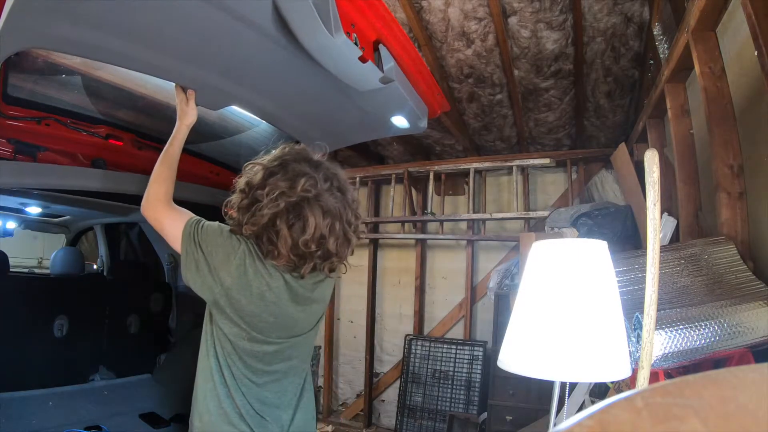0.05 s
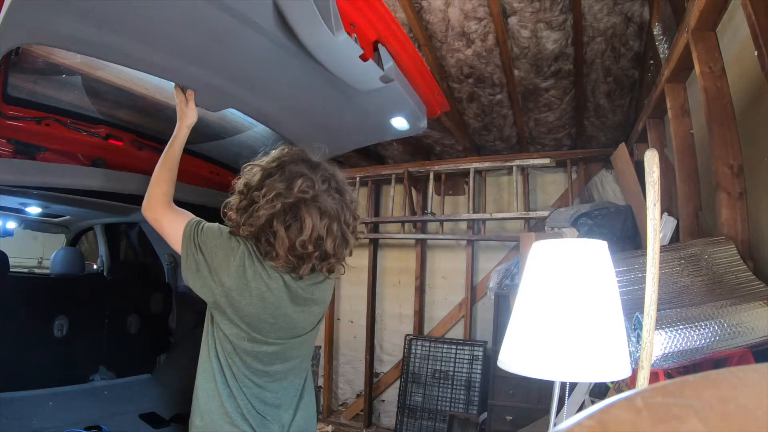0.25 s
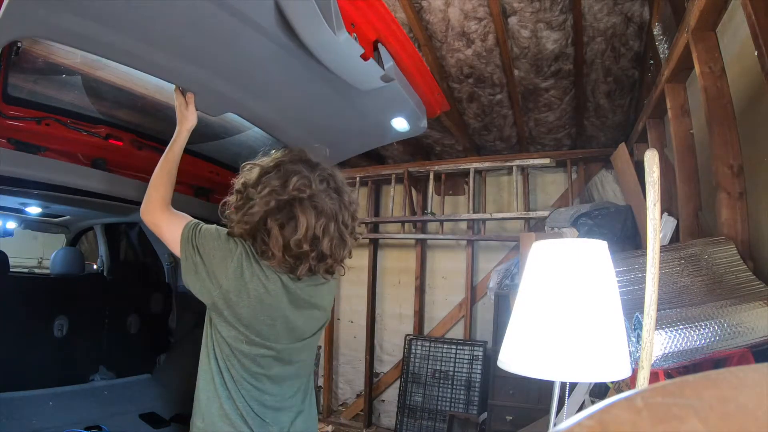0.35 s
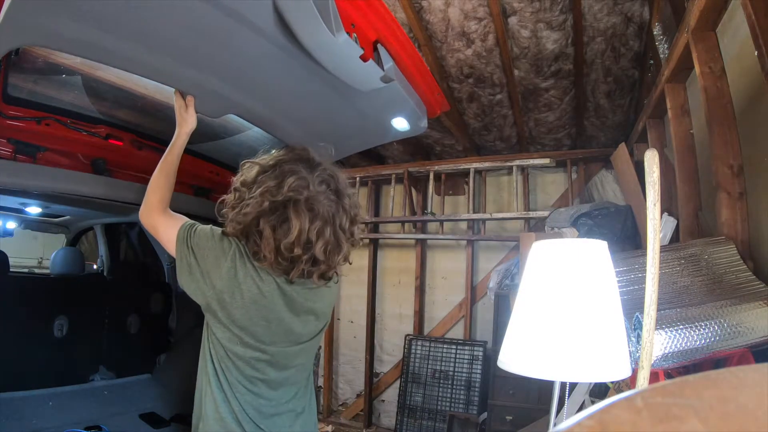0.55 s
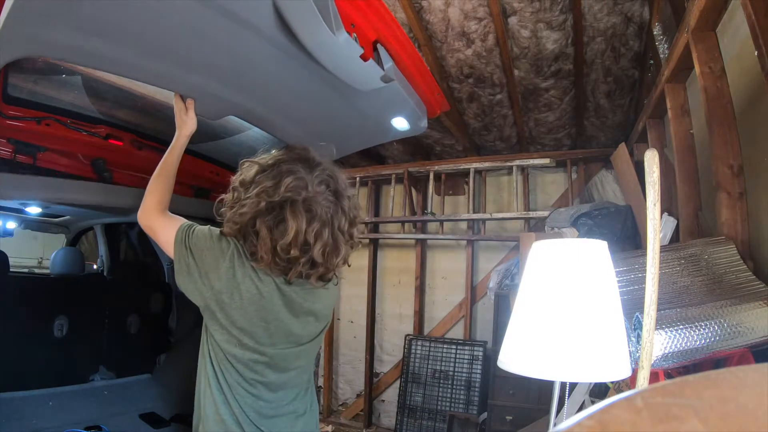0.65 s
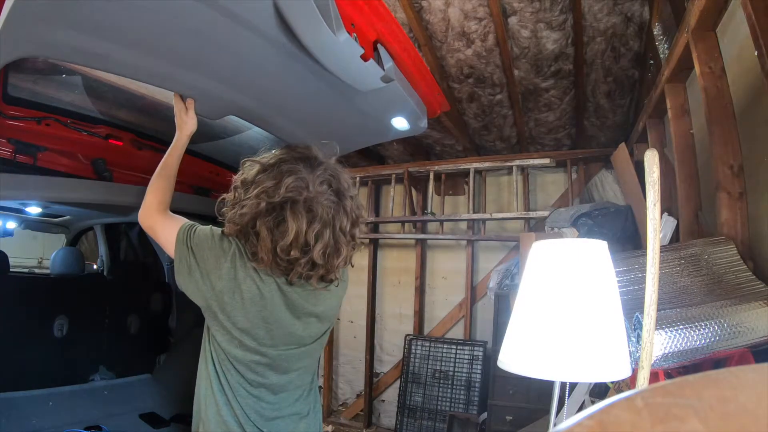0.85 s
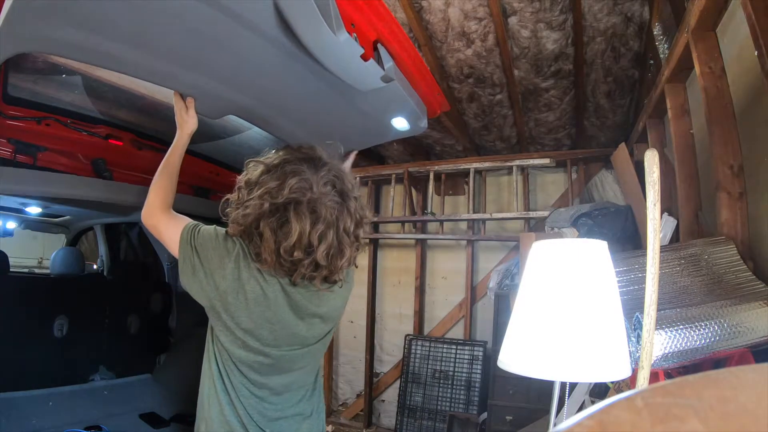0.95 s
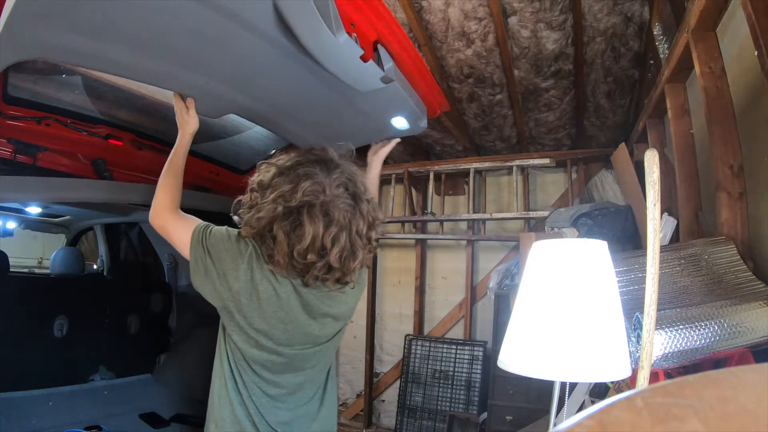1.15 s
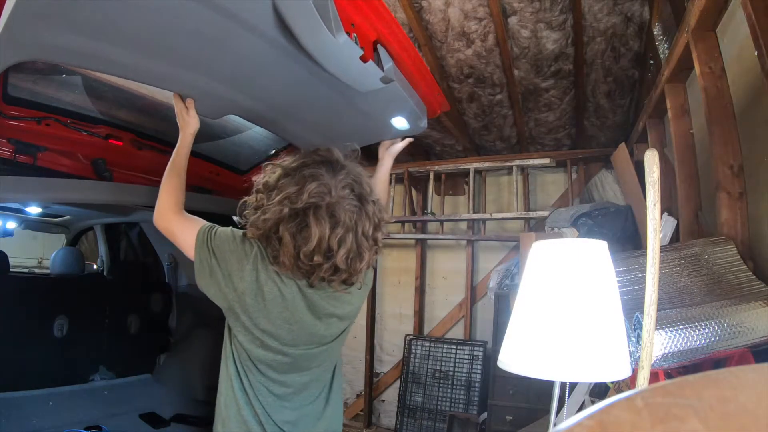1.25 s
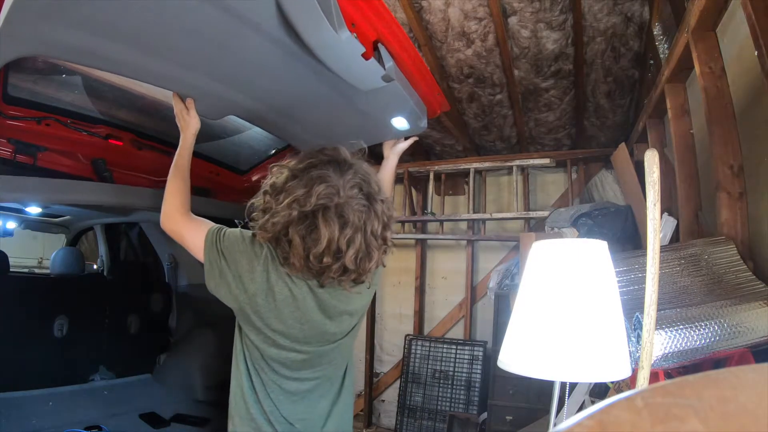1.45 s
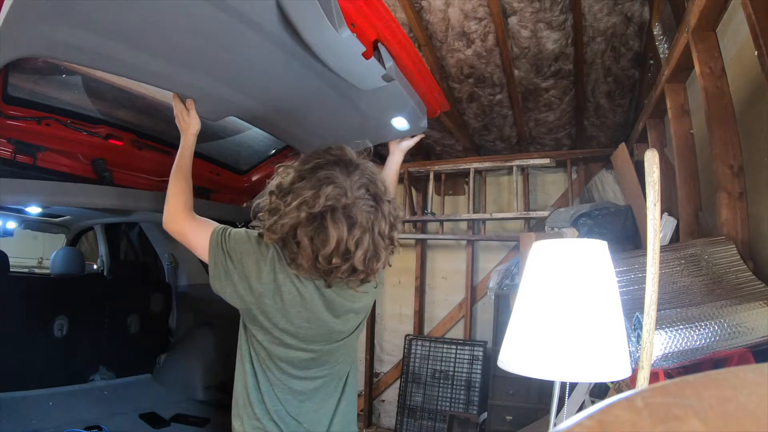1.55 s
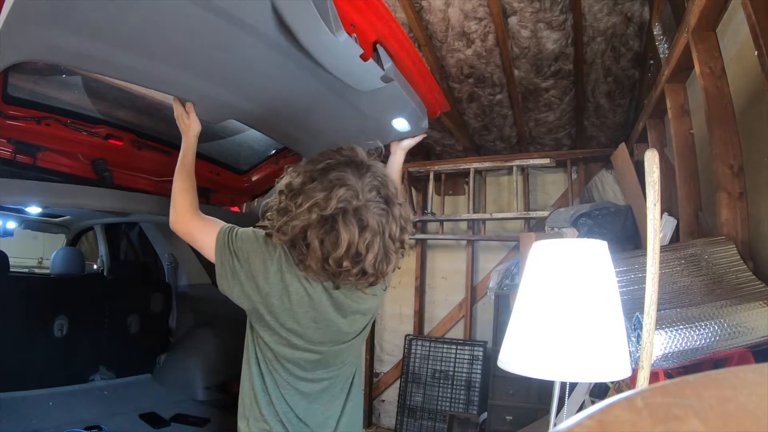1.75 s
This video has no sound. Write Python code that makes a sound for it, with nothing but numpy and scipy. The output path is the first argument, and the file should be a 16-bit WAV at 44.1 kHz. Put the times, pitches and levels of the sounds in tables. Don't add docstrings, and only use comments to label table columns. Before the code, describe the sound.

Sharp plastic crack as a car panel fastener pops free, then faint creaks in a quiet garage

```python
import sys
import numpy as np
from scipy import signal
from scipy.fft import rfft, irfft
from scipy.io import wavfile
from scipy.ndimage import uniform_filter1d

SR = 44100
rng = np.random.default_rng(int(sys.argv[2]) if len(sys.argv) > 2 else 0)


def pcm_store(signal):
    levels = np.round(np.clip(np.atleast_2d(signal), -1, 1) * 32767)
    wavfile.write(sys.argv[1], SR, levels.astype(np.int16).T)


def field_ratio(decibels):
    return 10 ** (np.asarray(decibels, dtype=float) / 20)


N = 79380

# [f/Hz, likeness 0-1]
AIR_SAME = [(60, 1), (180, 1), (530, 0.76), (1580, 0.44), (4700, 0.38), (14000, 0.02)]
# [f/Hz, lead/rad]
AIR_LEAD = [(100, 0), (780, 0), (3100, 0), (5000, 0.74)]
# [f/Hz, level/dB]
AIR_PAN = [(60, -1.2), (230, -1.07), (920, 1), (3580, 1.0), (14000, -1)]


def evened(x):
    return x / np.sqrt(np.mean(x ** 2) + 1e-20)


def read(points, hz):
    f, value = np.transpose(points)
    return np.interp(np.log(hz + 1), np.log(f + 1), value)


def add(mix, s, sound):
    part = mix[:, round(s * SR):][:, :sound.shape[1]]
    part += sound[:, :part.shape[1]]


def noise(spectrum, same, lead, pan, patchy_db, size, count):
    frames = count * 4 // size + 6
    hz = np.fft.rfftfreq(size, 1 / SR)
    a, b, c, d, patches = rng.standard_normal((frames, len(hz), 5)).T
    patches = uniform_filter1d(patches, size=10, axis=0)
    patches = evened(uniform_filter1d(patches, size=10, axis=1))
    likeness = np.clip(read(same, hz), 0, 1)[:, None]
    left = a + 1j * b
    shared = likeness * left * np.exp(-1j * read(lead, hz))[:, None]
    separate = np.sqrt(1 - likeness ** 2) * (c + 1j * d)
    right = (shared + separate) / field_ratio(read(pan, hz))[:, None]
    edge_db = -200 * ((hz < spectrum[0][0] * .5) | (hz > spectrum[-1][0] * 2))
    level_db = (read(spectrum, hz) + edge_db)[:, None] + patchy_db * patches
    z = np.array([left, right]) * field_ratio(level_db)
    sound = signal.istft(z, nperseg=size, noverlap=size * 3 // 4)[1]
    return evened(sound[:, size:size + count])


def air():
    # [f/Hz, level/dB per Hz]
    air_colour = [(88, -9), (150, -11), (261, -8), (298, -5.5), (328, -9), (383, -11), (957, -11),
                  (3380, -28), (14400, -59.5)]
    hiss = noise(air_colour, AIR_SAME, AIR_LEAD, AIR_PAN, patchy_db=1.2, size=1024, count=N)
    top_edge = signal.butter(8, 11600, fs=SR, output="sos")
    return field_ratio(-47.5) * signal.sosfilt(top_edge, hiss)


def rumble():
    # [f/Hz, level/dB per Hz]
    drone_colour = [(12, -34), (20, -17), (27, -14), (49, -2.5), (65, 2.5), (126, -5), (200, -27),
                    (260, -63), (440, -120)]
    # [t/s, level/dB]
    early_swell = [(0, -29.5), (.03, -32.5), (.1, -38), (.25, -34)]
    # [t/s, level/dB]
    late_swell = [(.45, -33.5), (.6, -32.5), (.8, -40.5), (1.0, -37.5), (1.2, -38), (1.4, -37), (1.65, -33),
                  (1.8, -39.5)]
    s, db = np.transpose(list(early_swell) + list(late_swell))
    low = noise(drone_colour, AIR_SAME, AIR_LEAD, AIR_PAN, patchy_db=-3.5, size=4096, count=N)
    return field_ratio(np.interp(np.arange(N) / SR, s, db)) * low


def garage():
    # [f/Hz, t60/s]
    tail_t60 = [(100, 1), (300, 0.65), (700, 0.34), (1500, 0.26), (4000, 0.23), (10000, 0.28)]
    # [f/Hz, likeness 0-1]
    tail_same = [(100, .99), (400, 1), (1000, 0.74), (3000, 0.65), (10000, .4)]
    white = [(50, 0), (16000, 0)]
    x = noise(white, tail_same, AIR_LEAD, AIR_PAN, patchy_db=1.5, size=512, count=SR * 3 // 4)
    hz, t, z = signal.stft(x, SR, nperseg=512)
    decay_db = -60 * t / np.maximum(read(tail_t60, hz), .05)[:, None]
    tail = signal.istft(z * field_ratio(decay_db), SR, nperseg=512)[1]
    return tail / np.linalg.norm(tail[0])


def ports(x):
    # [f/Hz, lead/rad]
    panel_lead = [(100, -.08), (250, -.2), (600, -.6), (1200, -1.3), (2700, .3), (5200, 1.1), (8000, .8),
                  (13000, 1.0)]
    # [f/Hz, level/dB]
    panel_pan = [(60, -0.61), (150, -0.74), (370, -0.51), (920, -1.7), (2270, 1), (5640, 1.0),
                 (14000, -1.0)]
    hz = np.fft.rfftfreq(N, 1 / SR)
    turn = np.exp(.5j * read(panel_lead, hz)) * field_ratio(read(panel_pan, hz) / 2)
    return irfft(rfft(x, N) * np.array([turn, 1 / turn]), N)


def panel(t60_share, centre_hz, bell_db, uneven):
    # [f/Hz, level/dB, t60/s]
    modes = [(114.6, -12.5, 1), (133.2, 7, 0.29), (171.3, -18, 0.96), (226.2, -10.5, 0.45),
             (234.6, -11.5, 0.54), (288.2, -14, 0.72), (339.6, -7, .25), (381.4, -15, 0.56),
             (436, -10, 0.28), (471, -18.5, 0.15), (638.8, -2.5, 0.22), (779.4, -12.5, 0.22),
             (967, -26.5, 0.12), (1170, -46, 0.046)]
    rise_turns = 1.52
    t = np.arange(SR // 2) / SR
    ring = np.zeros(len(t))
    for k, (hz, db, t60) in enumerate(modes):
        direction = -(-1) ** k
        off_centre_db = bell_db * np.log2(hz / centre_hz) ** 2
        envelope = field_ratio(uneven * db - 60 * t / (t60 * t60_share) - off_centre_db)
        rise = 1 - np.exp(-t * hz / rise_turns)
        ring += direction * envelope * rise * np.sin(2 * np.pi * hz * t)
    return ring


def stroke(length):
    u = np.arange(4096) / SR / length
    return np.minimum(u / .2, 1) * np.exp(-1.5 * u ** 2)


def slip_spectrum(tilt_db):
    hz = np.fft.rfftfreq(4096, 1 / SR)
    tilt = field_ratio(tilt_db * np.log2(np.maximum(hz, 700) / 3000))
    return tilt * hz ** 2 / (hz ** 2 + 600 ** 2) / (1 + (hz / 8000) ** 4)


def creaks(room):
    # [t/s, peak level/dB, brightness/dB per octave]
    ticks = [
        (.1628, -49, 6),
        (.4811, -38, -4.5),
        (0.687, -46, -4),
        (0.7143, -43, -3),
        (.7310, -44, -12),
        (1.4410, -49, 0),
        (1.4770, -38.5, -1.5),
    ]
    # [t/s, length/s, level/dB, brightness/dB per octave]
    rubs = [
        (0.159, 0.026, -61, 1),
        (0.206, 0.0045, -60, 0.5),
        (0.4793, 0.018, -32.5, -14.5),
        (0.7106, 0.022, -51, -7.5),
        (0.72, 0.034, -40, -8),
        (1.438, 0.021, -45, -9.5),
        (1.479, .01, -45, -10),
        (1.523, .006, -63, -2),
    ]
    # [t/s, length/s, level/dB, centre f/Hz]
    nudges = [(0.149, 0.032, -45, 700), (0.203, 0.005, -31, 395), (.4805, 0.02, -39, 284),
              (0.679, 0.0098, -57, 406), (.724, 0.014, -42, 720), (1.435, 0.035, -44, 456.7),
              (1.478, 0.065, -45, 397), (1.573, 0.068, -51.5, 284), (.005, 0.024, -45, 263),
              (.66, 0.056, -40, 133), (1.6, 0.032, -50, 120.4)]
    slips_per_s, slip_spread_db, wet_db = 9000, 2.5, -5.5
    dry = np.zeros((1, N))
    for s, db, tilt_db in ticks:
        tick = np.roll(irfft(slip_spectrum(tilt_db)), 2048)
        add(dry, s - 2048 / SR, field_ratio(db) * tick[None] / tick.max())
    for s, length, db, tilt_db in rubs:
        chance, side, size = rng.random((4096, 3)).T
        sizes = field_ratio(-slip_spread_db * np.log(size + .1))
        slips = (chance < slips_per_s / SR) * np.sign(side - .5) * sizes
        rub = evened(irfft(rfft(slips) * slip_spectrum(tilt_db))) * stroke(length)
        add(dry, s, field_ratio(db) * rub[None])
    for s, length, db, centre_hz in nudges:
        push = rng.standard_normal(4096) * stroke(length)
        ring = signal.fftconvolve(push, panel(t60_share=.2, centre_hz=centre_hz, bell_db=6, uneven=0))
        add(dry, s, field_ratio(db) * ring[None] / np.std(ring[:2048]))
    return ports(dry) + field_ratio(wet_db) * signal.fftconvolve(dry, room, axes=1)[:, :N]


def resonate(x, hz, width):
    b, a = signal.iirpeak(hz, hz / width, SR)
    return signal.lfilter(b, a, signal.lfilter(b, a, x))


def snap(room):
    # [f/Hz, width/Hz, level/dB]
    fastener = [(1090, 650, 0.5), (1660, 550, -1.5), (2410, 1220, 2), (3060, 1400, -12), (5200, 1500, -6.5),
                (7260, 990, -7), (7930, 880, -17), (12600, 3500, -24)]
    # [f/Hz, level/dB]
    tail_colour = [(150, -30), (250, -4), (450, 0), (1100, -7), (2500, -18), (4500, -30), (7500, -32),
                   (14000, -58)]
    snap_s, crack_db, ring_db, tail_db = .2112, -11, -8.5, -19.5
    crack_rise_s, crack_t60, tail_rise_s = 0.0011, 0.038, 0.0017
    t = np.arange(SR // 10) / SR
    a, b = rng.standard_normal((2, len(t)))
    burst = np.array([a + 0.45 * b, a - 0.21 * b])
    burst = burst * np.minimum(t / crack_rise_s, 1) * field_ratio(-60 * t / crack_t60)
    crack = np.zeros_like(burst)
    for hz, width, db in fastener:
        crack += field_ratio(db) * resonate(burst, hz, width) * np.sqrt(SR / 8 / width)

    hz = np.fft.rfftfreq(room.shape[1], 1 / SR)
    tail = irfft(rfft(room) * field_ratio(read(tail_colour, hz)), room.shape[1])
    tail = tail / np.sqrt(np.mean(tail[:, :SR // 20] ** 2))
    u = np.arange(tail.shape[1]) / SR
    tail = tail * (1 - np.exp(-u / tail_rise_s)) * np.clip((.7 - u) * 10, 0, 1)

    direct, answer = np.zeros((2, 2, N))
    add(direct, snap_s, field_ratio(crack_db) * crack)
    ring = panel(t60_share=0.96, centre_hz=300, bell_db=0, uneven=1)
    add(direct, snap_s, field_ratio(ring_db) * ring[None])
    add(answer, snap_s, field_ratio(tail_db) * tail)
    return ports(direct) + answer


def scene():
    room = garage()
    return air() + rumble() + creaks(room) + snap(room)


def band_limit(x):
    return signal.sosfilt(signal.butter(12, 14580, fs=SR, output="sos"), x)


def record(dry):
    threshold_db, max_duck_db, recover_db_per_s, attack_s = -23, 8.5, 22, 0.202
    power = signal.lfilter([1 / 600], [1, 1 / 600 - 1], (dry ** 2).mean(0))
    power_db = 10 * np.log10(power + 1e-12)
    fall_db = np.arange(N) * recover_db_per_s / SR
    over_db = np.maximum.accumulate(power_db + fall_db) - fall_db - threshold_db
    step = 1 / (attack_s * SR)
    duck_db = signal.lfilter([step], [1, step - 1], np.clip(over_db, 0, max_duck_db))
    return band_limit(dry / field_ratio(duck_db))


dry = scene()
out = record(dry)
pcm_store(out)
```